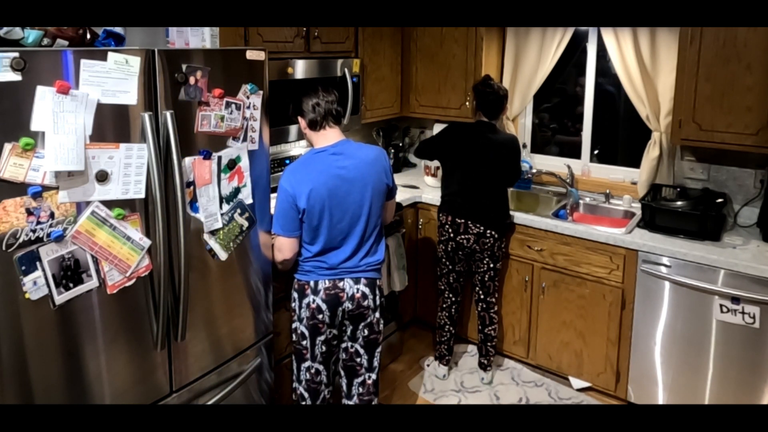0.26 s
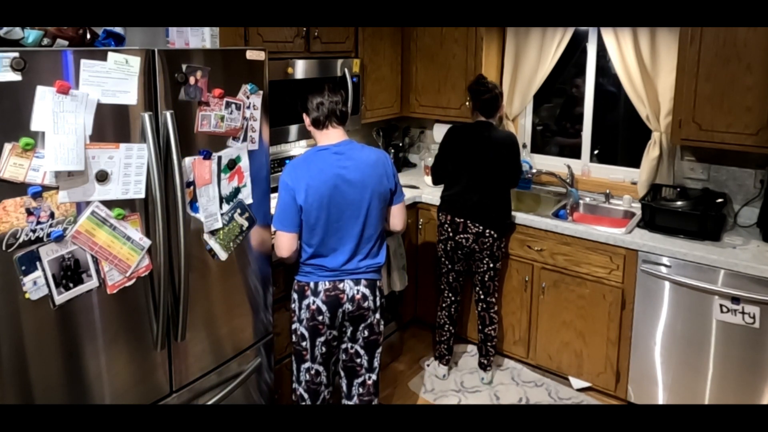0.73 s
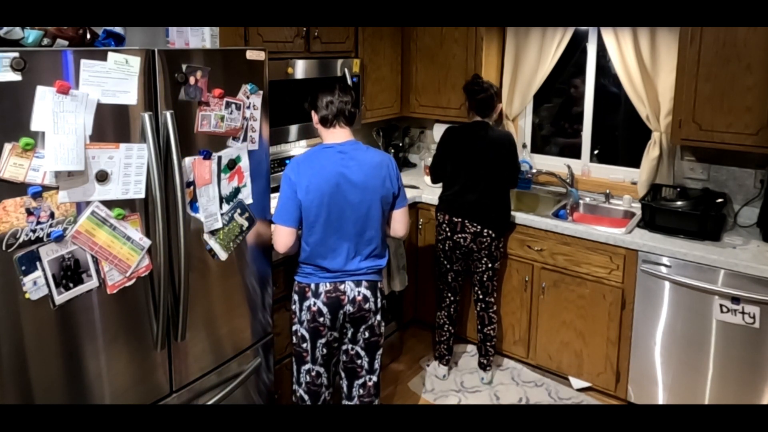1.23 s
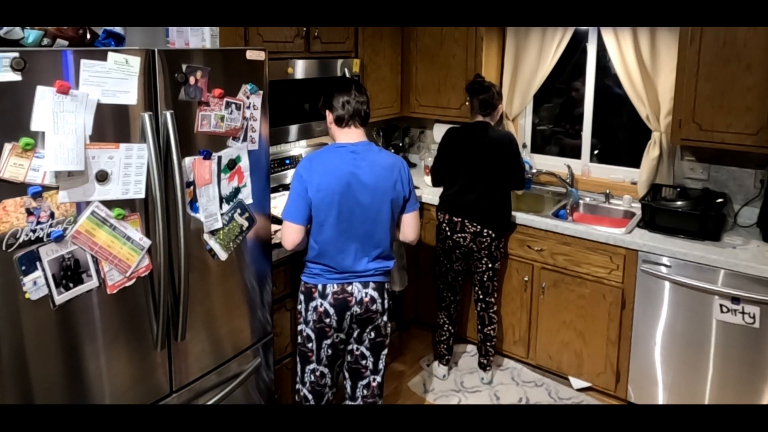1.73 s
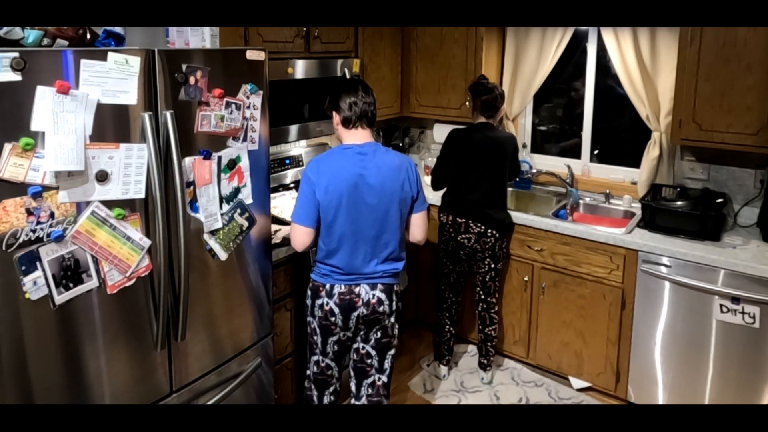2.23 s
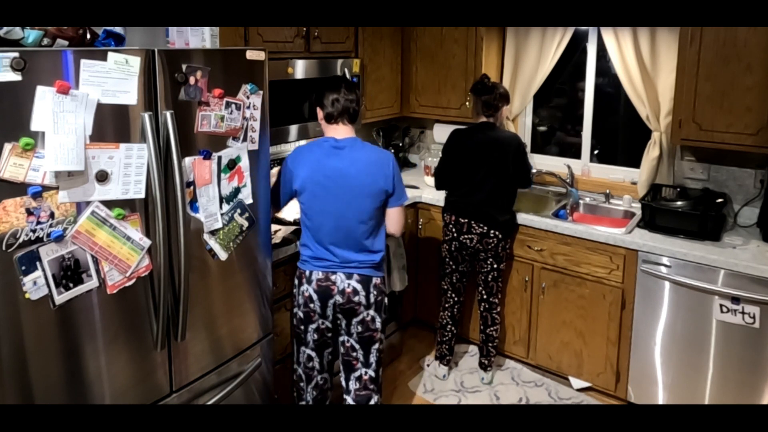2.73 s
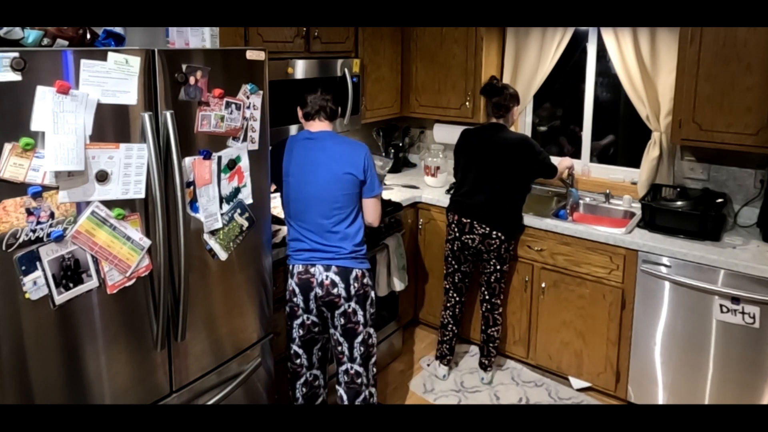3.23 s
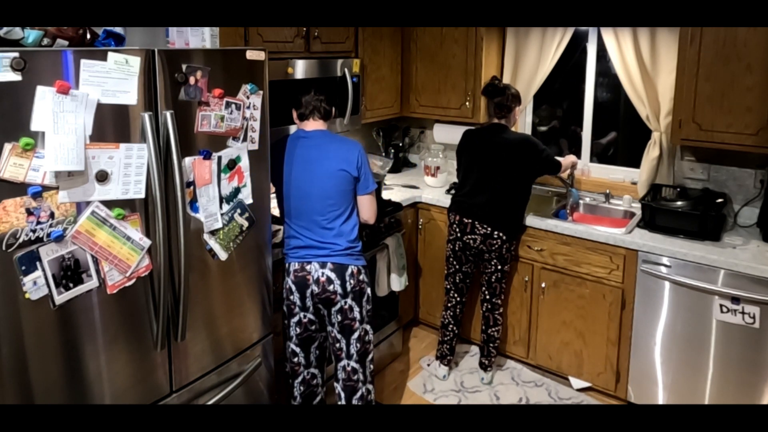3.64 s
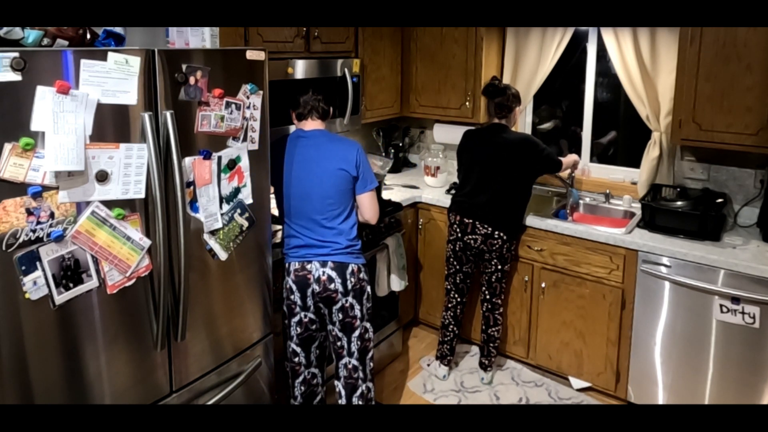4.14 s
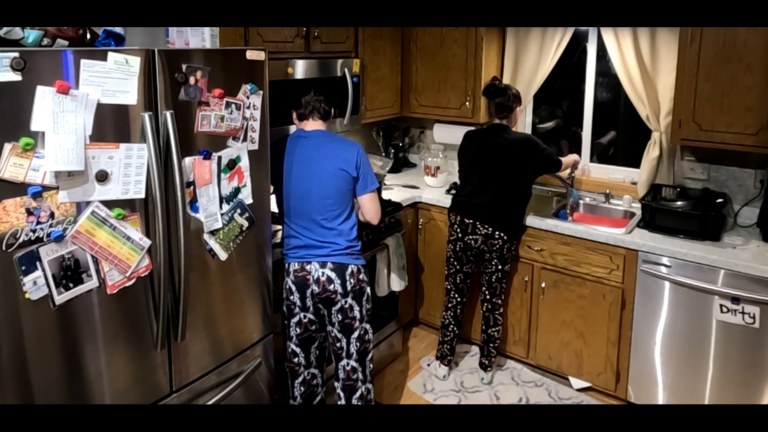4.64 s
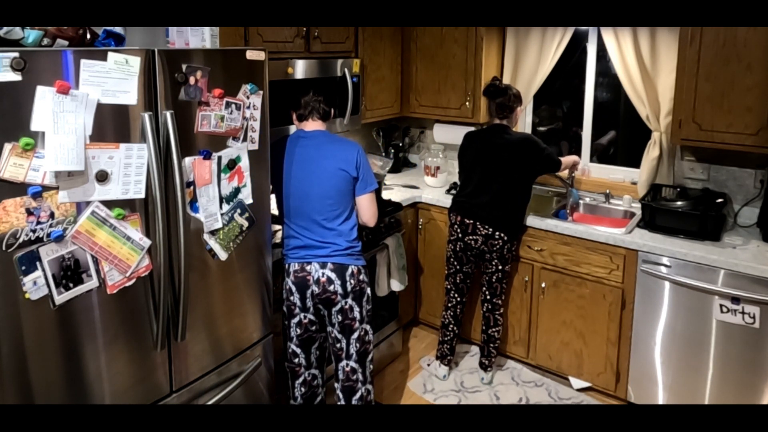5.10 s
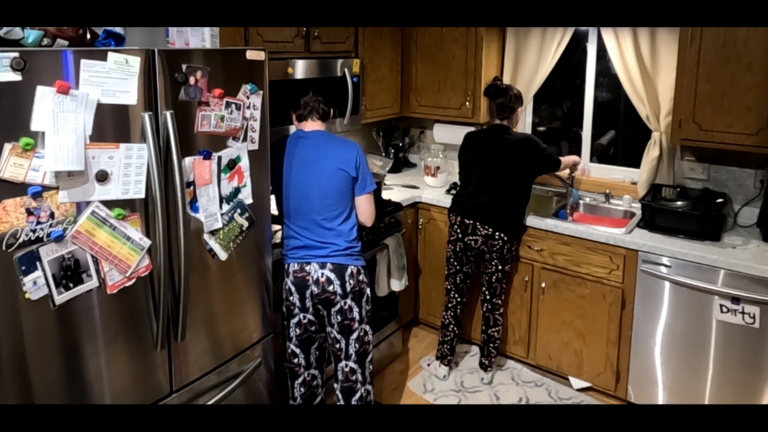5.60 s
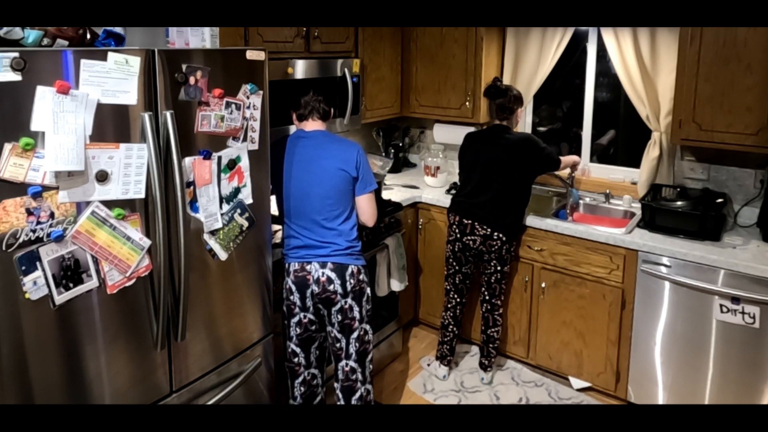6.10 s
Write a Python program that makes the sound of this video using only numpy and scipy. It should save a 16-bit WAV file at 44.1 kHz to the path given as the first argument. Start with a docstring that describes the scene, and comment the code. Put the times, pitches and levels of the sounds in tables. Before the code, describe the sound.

Hollow plastic clatter and scraping, a sharp cupboard door slam, faint cloth and footsteps, then running tap water hisses, whistles and patters in a metal basin.

```python
"""Plastic taps and lid scrapes on a counter are heard first, then a banging cupboard door, cloth and feet.
Last, a tap hisses and sings while its stream patters into a steel sink; room noise runs throughout.
Contacts are shaped noise bursts, hollow bodies are decaying modes, and rubbing and water are random grains.
Each source gets its own reflections in one small kitchen, then gain control and a treble cut."""
import sys
import numpy as np
from scipy import signal
from scipy.fft import rfft, irfft, next_fast_len
from scipy.io import wavfile
from scipy.ndimage import uniform_filter1d, map_coordinates

SR = 44100
rng = np.random.default_rng(int(sys.argv[2]) if len(sys.argv) > 2 else 0)


def generate_wav(sig):
    """Save sig (samples, or channels by samples) to the path in sys.argv[1] as 16-bit PCM at SR."""
    pcm = np.round(np.clip(np.atleast_2d(sig).T, -1, 1) * 32767).astype(np.int16)
    wavfile.write(sys.argv[1], SR, pcm)


N = 280476
T = np.arange(N) / SR  # seconds
SIZE = next_fast_len(2 * N)  # padded transform length
FREQ = np.arange(SIZE // 2 + 1) * SR / SIZE  # Hz

# What the container rings with. Each row: frequency in Hz, level in dB, 60 dB decay time in seconds.
TUB_MODES = [(593, -16, 0.04), (1120, -12, 0.022), (1389, 1.5, 0.034), (1460, -0.5, 0.086),
             (1595, -12.5, 0.053), (2820, -16, 0.028), (3960, -11, 0.033)]
# Contact noise of taps and of the lever. Each row: frequency in Hz, level in dB.
TAP_COLOUR = [(150, -10), (400, 1), (640, 3), (850, -10.5), (1100, 3.5), (1500, 0), (2000, 0), (3200, 0.5),
              (4300, -3.5), (6300, -4), (8500, -20.5), (10300, -24), (12500, -70)]
# Thuds through cabinets and floor. Each row: frequency in Hz, level in dB.
THUD_COLOUR = [(10, -23.5), (22, 2.5), (45, 0), (95, -11), (200, -29.5), (800, -74.5)]
# Soft bumps on wooden fronts. Each row: frequency in Hz, level in dB.
BUMP_COLOUR = [(70, -28.5), (160, 0.5), (230, -0.5), (340, -13.5), (620, -20.5), (1000, -42), (2500, -57)]
# The door meets its frame and chatters. Each row: start in seconds, relative level in dB.
SLAM = [(2.471, -15), (2.476, 1.5), (2.4802, -0.5), (2.485, -6), (2.491, -9), (2.4953, -4)]
OPENS_S = 3.89  # the flow of water begins


def amp(db):
    """Decibels to gain."""
    return 10 ** (np.asarray(db) / 20)


def unit(x):
    """Scale to rms 1."""
    return x / np.sqrt(np.mean(x ** 2))


def peak_level(x, size=220):
    """Scale so that the loudest stretch of this many samples has rms 1."""
    return x / np.sqrt(uniform_filter1d(x ** 2, size).max())


def along(points, hz=FREQ):
    """Read (Hz, value) points on a log-frequency axis."""
    f, value = np.transpose(points)
    return np.interp(np.log(hz + 1), np.log(f), value)


def bins(x):
    """Frequencies of the spectrum of x."""
    return np.arange(len(x) // 2 + 1) * SR / len(x)


def causal(x, gain):
    """Filter by a gain per frequency at minimum phase, with no sound ahead of its cause."""
    n = len(x)
    cepstrum = irfft(np.log(gain), n)
    # folding the cepstrum onto positive time gives the minimum phase
    cepstrum[1:n // 2] *= 2
    cepstrum[n // 2 + 1:] = 0
    return irfft(rfft(x) * np.exp(rfft(cepstrum)), n)


def colour(x, points, tilt_db=0):
    """Filter through (Hz, dB) points, tilted about 2 kHz by so many dB an octave."""
    hz = bins(x)
    octaves = np.log2(np.clip(hz, 300, 9000) / 2000)
    return causal(x, amp(along(points, hz) + tilt_db * octaves))


def even(x, width_hz):
    """Keep the timing of x but give every band of this width the same power."""
    power = uniform_filter1d(abs(rfft(x)) ** 2, max(int(width_hz * len(x) / SR), 1))
    return causal(x, (power + 1e-6 * power.mean()) ** -.5)


def resonate(x, peaks):
    """Drive (Hz, width in Hz, dB) resonances; dB is the power of each, and the skirts are steep."""
    hz = bins(x)
    power = sum(amp(db) ** 2 / w / (1 + ((hz - f) / w) ** 2) ** 2 for f, w, db in peaks)
    return unit(irfft(rfft(x) * np.sqrt(power), len(x)))


def ring(modes, t):
    """Sum decaying (Hz, dB, t60) modes, each with a chance phase."""
    return sum(amp(db - 60 * t / t60) * np.sin(2 * np.pi * (f * t + rng.random()))
               for f, db, t60 in modes)


def add(out, s, x):
    """Mix x into out from time s on."""
    i = max(int(s * SR), 0)
    out[i:i + len(x)] += x[:N - i]


def walk(rate):
    """Slow smooth chance with a spread near 1, from so many new values a second."""
    k = int(SR / rate)
    steps = np.repeat(rng.standard_normal(N // k + 1), k)
    return unit(uniform_filter1d(uniform_filter1d(steps, k), k)[:N])


def grains(n, rate, spread_db):
    """Tiny random impacts, so many a second, of uneven size."""
    struck = rng.random(n) < rate / SR
    sign = rng.choice([-1, 1], n)
    return unit(struck * sign * amp(spread_db * np.minimum(rng.exponential(size=n), 4)))


def swell(start_s, hold_s, attack_s, release_s):
    """Linear attack, hold counted from the start, and exponential release."""
    age = T - start_s
    return np.clip(age / attack_s, 0, 1) * np.exp(-np.maximum(age - hold_s, 0) / release_s)


def waver(x, spread=.003, rate=3):
    """Let the pitch of x wander by this share of itself."""
    place = np.arange(N) + np.cumsum(spread * walk(rate))
    return map_coordinates(signal.resample(x, 4 * N), [4 * place], order=1, mode="mirror")


def rubs(strokes, points, rate, spread_db, size=16384):
    """Stick-slip grains that swell and fade with each stroke."""
    out = np.zeros(N)
    for s, length, db, tilt in strokes:
        pressure = np.sqrt(np.sin(np.pi * np.minimum(T[:size] / length, 1)).clip(0))
        texture = unit(colour(grains(size, rate, spread_db), points, tilt))
        add(out, s - length / 2, texture * pressure * amp(db))
    return out


def bumps(contacts, points, size=16384):
    """Soft, heavy contacts push in a half-sine and shake mostly the low register."""
    out = np.zeros(N)
    for s, length, db in contacts:
        push = rng.standard_normal(size) * np.sin(np.pi * np.minimum(T[:size] / length, 1))
        add(out, s - length / 2, peak_level(colour(push, points), size=1024) * amp(db))
    return out


def ports(mid, side):
    """Two microphone ports: left and right from the spectra of a shared and an unshared part."""
    # Each row: frequency in Hz, phase in radians by which the left leads.
    port_phase = [(60, -.02), (600, -.2), (1400, -.44), (3200, -.65), (5200, -.45), (8000, -.25)]
    # Diffuse sound. Each row: frequency in Hz, side minus mid level in dB.
    port_side = [(50, -34), (150, -23), (500, -13), (1300, -10.5), (3000, -8.5), (9000, -7.5)]
    side = side * amp(along(port_side))
    turn = np.exp(.5j * along(port_phase))
    return irfft([(mid + side) * turn, (mid - side) / turn], SIZE)[:, :N]


def reflections(order=32768, count=9):
    """Dense echoes of cabinets and walls, dying at their own pace in each octave."""
    # Decay of the room. Each row: frequency in Hz, 60 dB decay time in seconds.
    room_t60 = [(100, 0.18), (200, 0.71), (400, 0.38), (1200, 0.35), (3000, 0.4), (6000, 0.21),
                (12000, 0.5)]
    t, spectrum = T[:order], rfft(rng.standard_normal(order))
    octave = np.clip(np.log2((bins(t) + 1) / 60), 0, count - 1)
    tail = 0
    for k in range(count):
        t60 = along(room_t60, 60 * 2 ** k)
        band = irfft(spectrum * np.maximum(1 - abs(octave - k), 0))
        tail = tail + band * np.exp(-np.log(1000) * t / t60)
    tail = tail * np.clip(t / 0.002, 0, 1) * (1 + 1.6 * np.exp(-t / 0.0099))  # counter and cabinets answer first
    return tail / np.sqrt(np.sum(tail ** 2))


def room(x, wet_db, pan_db):
    """Direct sound plus its own reflections, the shared path evened in power; pan is left minus right."""
    wet, spectrum = amp(wet_db), rfft(x, SIZE)
    shared = wet * reflections()
    shared[0] += 1  # direct sound
    unshared = wet / np.hypot(1, wet) * reflections()
    mid = spectrum * rfft(even(shared, width_hz=70), SIZE)
    side = spectrum * rfft(unshared, SIZE)
    return ports(mid, side) * amp(np.array([[pan_db], [-pan_db]]) / 2)


def air(flutter_db=0.5, side_db=3):
    """Steady room noise of appliances, with an unsteady rumble underneath."""
    # Each row: frequency in Hz, level in dB.
    air_colour = [(12, -29), (20, -6), (40, -10), (76, -28), (164, -8), (256, -15), (286, -16.5),
                  (638, -23.5), (841, -25.5), (1310, -23), (1550, -27), (2340, -32.5), (2770, -37),
                  (7100, -37.5), (15000, -62.5)]
    air_db = -67.5
    rumble_colour = [(15, -6.5), (35, -2), (70, -11), (200, -31), (1000, -96.0)]  # (Hz, dB)
    mid, side = (rfft(unit(colour(rng.standard_normal(N), air_colour)), SIZE) for _ in range(2))
    rumble = unit(colour(rng.standard_normal(N), rumble_colour)) * amp(-86.0 + 4.9 * walk(5.5))
    return ports(mid, side * amp(side_db)) * amp(air_db + flutter_db * walk(4.927)) + rumble


def taps(contact_s=0.0042, ring_db=-5, size=8192):
    """Each tap is a short gritty crack plus the container's ring; hard ones sound more hollow."""
    # Container and utensil taps. Each row: time in seconds, level of the loudest 5 ms in dB,
    # treble boost from 5 kHz up in dB.
    tap_hits = [(0.0109, -47.5, -20), (0.0216, -37.5, -4), (0.171, -43, -11.5), (0.2224, -56.5, 5),
                (0.2609, -36, -9), (0.2754, -47.5, -3), (0.4193, -51.5, -21), (0.6476, -48, -9.5),
                (0.7466, -53, -13), (0.7865, -52, -11), (0.8758, -48.5, -5.5), (1.0179, -46.5, -3.5),
                (1.127, -53.5, -9), (1.186, -59, -3)]
    # low boost in a tap of the hard level, and its fall per dB below that
    hard_tap_db, body_db, body_db_per_db = -36, 3.5, 0.3
    out, t = np.zeros(N), T[:size]
    touch = np.clip(t / 0.0033, 0, 1)  # plastic gives a little
    for s, db, edge in tap_hits:
        grit = rng.standard_normal(size) * touch * np.exp(-t / contact_s)
        crack = colour(even(grit, width_hz=350), TAP_COLOUR)
        blow = peak_level(crack) + amp(ring_db) * peak_level(ring(TUB_MODES, t) * touch)
        body = body_db + body_db_per_db * (db - hard_tap_db)
        blow = colour(blow, [(600, body), (1100, 0), (2200, 0), (5000, edge)])
        add(out, s - .001, peak_level(blow) * amp(db))
    return out


def low_knocks():
    """Deep thuds through cabinets and floor, and soft bumps against wooden fronts."""
    # Each row of both: middle in seconds, length in seconds, level of the loudest 23 ms in dB.
    thud_hits = [(.191, 0.057, -43.5), (.221, 0.034, -40.5), (.274, 0.049, -44.5), (.346, .1, -48.5),
                 (3.225, 0.045, -53.5), (3.74, .03, -60)]
    bump_hits = [(.213, 0.051, -46.5), (2.718, .03, -52), (2.895, 0.053, -54.5), (2.975, .05, -50.5),
                 (3.01, .05, -51.5), (3.25, .11, -60), (5.95, .1, -60.5)]
    return bumps(thud_hits, THUD_COLOUR) + bumps(bump_hits, BUMP_COLOUR)


def lid(ring_db=-7, size=8192):
    """Scraping round wakes the container's ring as well; the lid creaks as it seats."""
    # Each row of both: middle in seconds, length in seconds, level in dB, brightness in dB per octave.
    scrape_strokes = [(.615, 0.13, -69, 1), (.68, 0.056, -58, 1.5), (.785, 0.05, -51.5, -2),
                      (.815, 0.043, -53, 5), (.91, 0.039, -60.5, 1), (1.075, 0.049, -53.5, 3),
                      (1.145, 0.039, -52, 4), (1.2, 0.044, -57, 4.5)]
    creak_strokes = [(1.314, .008, -59.5, -3), (1.345, .04, -72, -1), (1.395, 0.06, -71.5, 1)]
    # Each row of both: frequency in Hz, level in dB.
    scrape_colour = [(300, -33), (600, -3), (850, -12), (1150, 4), (1450, 7), (1700, 8), (2800, 7),
                     (4500, -2), (6500, -7), (8300, -23), (10300, -29), (12500, -60)]
    creak_colour = [(1000, -28), (1700, -2), (2100, 4), (2650, -2), (3100, -22), (4300, -12), (6000, -41),
                    (12000, -48)]
    scrape = rubs(scrape_strokes, scrape_colour, rate=1000, spread_db=2.5)
    tub = signal.fftconvolve(scrape, ring(TUB_MODES, T[:size]))[:N]
    creak = rubs(creak_strokes, creak_colour, rate=910, spread_db=-1.0)
    return scrape + unit(tub) * scrape.std() * amp(ring_db) + creak


def cloth():
    """Sleeves and hands brush along in dense, fine grains; the short stroke at 2.72 s is the door's latch
    settling."""
    # Each row: middle in seconds, length in seconds, level in dB, brightness in dB per octave.
    rustle_strokes = [(2.36, 0.17, -72.5, -4.5), (2.72, 0.04, -59, -6), (3.40, 0.096, -68.5, 8),
                      (3.52, 0.073, -70.5, 7.5), (3.607, .055, -57.5, -2.5), (3.68, 0.14, -58.5, -0.5),
                      (3.82, .1, -70.5, 3)]
    # Each row: frequency in Hz, level in dB.
    rustle_colour = [(400, -13), (850, -14.5), (1300, -3.5), (3000, 0), (5000, -3), (7500, -4.5),
                     (10000, -16.5), (13000, -32)]
    return rubs(rustle_strokes, rustle_colour, rate=4900, spread_db=0)


def door_crack(contact_s=.0025, gain_db=-17.0):
    """Wood on wood: a few rough contacts in quick succession."""
    # Each row: frequency in Hz, level in dB.
    door_colour = [(25, -11.5), (58, 4.5), (90, -15), (122, -19), (155, -4.5), (250, -10.5), (330, -8),
                   (650, -0.5), (830, -7.5), (1230, -0.5), (1450, -11.5), (1850, -15.5), (2200, -24),
                   (2900, -25), (4300, -33), (5200, -35), (8000, -47.5), (13000, -76)]
    push = np.zeros(N)
    for s, db in SLAM:
        add(push, s, np.exp(-T[:4096] / contact_s) * rng.standard_normal(4096) * amp(db))
    return peak_level(colour(even(push, width_hz=620), door_colour), size=900) * amp(gain_db)


def door_ring(rise_s=0.0053, gain_db=-19, size=32768):
    """Panel and cabinet take up the blow and boom on."""
    # Each row: frequency in Hz, level in dB, 60 dB decay time in seconds.
    door_modes = [(63.8, -11, 0.33), (110.4, -23.5, 0.37), (188, -12.5, 0.45), (288.4, -12.5, 0.3),
                  (349.6, -12.5, 0.25), (417, -5.5, 0.08), (654, -9.5, 0.28), (729, -14, 0.2),
                  (944, -7, 0.25), (996, -18.5, 0.33), (1175.4, 0, 0.19), (1243, -8.5, 0.36),
                  (1338, -23, 0.3)]
    out, t = np.zeros(N), T[:size]
    rise = (1 - np.exp(-t / rise_s)) ** 2
    add(out, SLAM[0][0], peak_level(ring(door_modes, t) * rise, size=900) * amp(gain_db))
    return out


def shuffle(rate=60, spread_db=2.0, deep_db=-67.5, wood_db=-71):
    """Shifting feet nudge the floor and the cabinet fronts at random."""
    deep = unit(colour(grains(N, rate, spread_db), THUD_COLOUR)) * amp(deep_db)
    wood = unit(colour(grains(N, rate, spread_db), BUMP_COLOUR)) * amp(wood_db)
    return (deep + wood) * swell(2.75, hold_s=0.96, attack_s=.05, release_s=0.13)


def valve_song():
    """Noise through narrow valve resonances sings, a little less once the flow has settled."""
    # Each row: frequency in Hz, width in Hz, level in dB.
    valve_peaks = [(3977, 27, -10.5), (5126, 39, 1), (5250, 45, -4.5), (5092, 126, -0.5), (5540, 21, -8),
                   (7110, 30, -20), (9410, 53, -11)]
    sing_db, settles_s, settling_s, settled_db = -46, 5.2, 0.088, -3.5
    settled = np.clip((T - settles_s) / settling_s, 0, 1)
    tones = waver(resonate(rng.standard_normal(N), valve_peaks))
    return tones * amp(sing_db + settled_db * settled + 0.84 * walk(14))


def jet(opening_s, hiss_db=-53, spurt_db=5):
    """Dense grains hiss at the valve, and the first spurt hisses a little louder."""
    # Each row: frequency in Hz, level in dB.
    hiss_colour = [(1500, -15.5), (2800, -3.5), (3700, 3.5), (4400, -13), (6100, 1), (6600, -5.5),
                   (7800, 2.5), (9000, -1.5), (9900, 1.5), (11200, -17.5), (13000, -17.5), (14700, -22)]
    hiss = unit(colour(grains(N, 16000, 4.0), hiss_colour))
    spurt = swell(OPENS_S, opening_s, opening_s, release_s=0.12)
    return hiss * amp(hiss_db + spurt_db * spurt + .5 * walk(24.5))


def stream():
    """The stream breaks into pattering drops that ring the steel basin, with a fine spray."""
    # Each row of both: frequency in Hz, level in dB.
    splash_colour = [(130, -10), (250, -1.5), (450, -9), (800, -7), (1100, -6), (1650, 1), (2400, 1),
                     (4000, -1.5), (7000, -4.5), (12000, -33)]
    spray_colour = [(1500, -33), (3000, 5), (4400, -6.5), (7500, 4), (9800, -2), (11500, -8), (14700, -19)]
    # Steel basin. Each row: frequency in Hz, width in Hz, level in dB.
    basin_peaks = [(1009, 25, -0.5), (1162, 47, 3), (1415, 62, -1), (3684, 74, 3.5)]
    # The stream strikes something in the sink and splashes up. Each row: start in seconds,
    # hold in seconds, release in seconds, level in dB over the steady patter.
    splash_hits = [(4.225, .06, .03, 0), (4.46, 0.27, 0.22, -1), (4.61, 0.08, 0.056, -6),
                   (5.44, .05, 0.069, -10)]
    patter_db, spray_db, basin_db = -58, -68, -63
    spray_power = 2.04  # spray grows as this power of the splashing
    splashing = 1 + sum(amp(db) * swell(s, hold, attack_s=0.039, release_s=release)
                        for s, hold, release, db in splash_hits)
    drops = grains(N, 3000, 3.65) * amp(1.63 * walk(30))
    patter = unit(colour(drops, splash_colour)) * splashing * amp(patter_db)
    spray = unit(colour(grains(N, 3300, 4.9), spray_colour)) * splashing ** spray_power * amp(spray_db)
    basin = resonate(drops, basin_peaks) * np.clip((T - OPENS_S) / .5, 0, 1) * amp(basin_db)
    return patter + spray + basin


def cavity(start_s=3.89, fill_s=0.42, hollow_db=-53.5, full_db=-68.5):
    """A hollow rings under the stream until it has filled, then stays on faintly."""
    hollow = amp(hollow_db) * swell(start_s, fill_s, attack_s=0.16, release_s=.06)
    return resonate(grains(N, 3000, 5.7), [(3193, 310, 0)]) * np.hypot(hollow, amp(full_db))


def water(opening_s=0.081):
    """One growing flow drives the valve's song and the rush of the stream; returns (song, rush)."""
    flow = np.clip((T - OPENS_S) / opening_s, 0, 1) ** 1.28
    return valve_song() * flow, (jet(opening_s) + stream() + cavity()) * flow


def lever(start_s=3.901, contact_s=0.014, gain_db=-54):
    """The tap's lever clicks off its seat in one short noise burst."""
    push = rng.standard_normal(N) * swell(start_s, 0, attack_s=0.0046, release_s=contact_s)
    return peak_level(colour(push, TAP_COLOUR)) * amp(gain_db)


def sink_shoves():
    """Something shifts in the basin under the stream, in short strokes of grains."""
    # Each row: middle in seconds, length in seconds, level in dB, brightness in dB per octave.
    shove_strokes = [(4.28, 0.036, -50, 2), (4.485, 0.039, -50, 1), (4.883, 0.018, -41, -1),
                     (4.905, 0.032, -42.5, 3)]
    # Each row: frequency in Hz, level in dB.
    shove_colour = [(80, -24), (170, 8), (550, 4.5), (850, -3.5), (1500, 7), (2500, -0.5), (4500, -1),
                    (8000, -12), (12000, -27)]
    return rubs(shove_strokes, shove_colour, rate=530, spread_db=-3.0)


def scene():
    """Counter, cupboard and sink sound in one room; the door's two corners each reach it by their own paths."""
    counter_pan_db, sink_pan_db = -.8, -.9  # left minus right
    song, rush = water()
    lows = low_knocks() + shuffle()
    corners = sum(room(door_crack(), wet_db=4, pan_db=.4) for _ in range(2))
    return (air()
            + room(taps(), wet_db=2.9, pan_db=counter_pan_db)
            + room(lid() + cloth(), wet_db=0, pan_db=counter_pan_db)
            + corners
            + room(door_ring() + lows, wet_db=-6, pan_db=-.1)
            + room(song, wet_db=-2, pan_db=-3.4)
            + room(rush + sink_shoves() + lever(), wet_db=4.0, pan_db=sink_pan_db))


def record(dry):
    """Gentle gain control that recovers slowly after a bang, then the top is cut."""
    recovery = 9 * T  # dB a second
    level_db = 20 * np.log10(abs(dry).max(axis=0) + 1e-9)
    held_db = np.maximum.accumulate(level_db + recovery) - recovery
    # 0.14 dB less for each dB above -32.5 dB
    gain = amp(-.14 * uniform_filter1d(np.maximum(held_db + 32.5, 0), size=256))
    top_cut = signal.ellip(10, .2, 70, 14800, fs=SR, output="sos")  # low-pass in Hz
    return signal.sosfilt(top_cut, dry * gain)


dry = scene()
out = record(dry)
generate_wav(out)
```